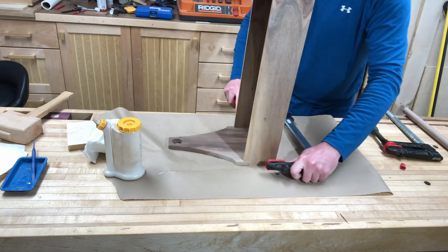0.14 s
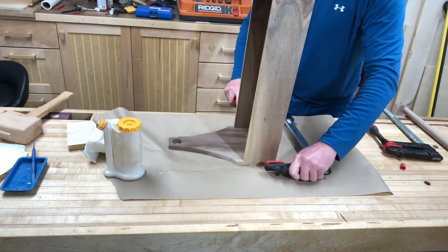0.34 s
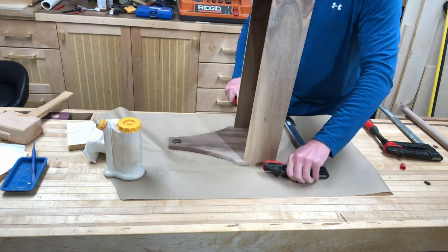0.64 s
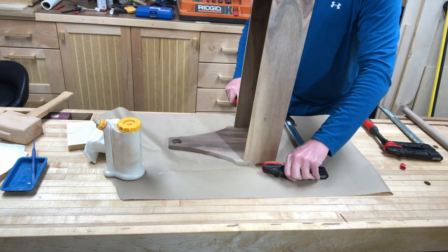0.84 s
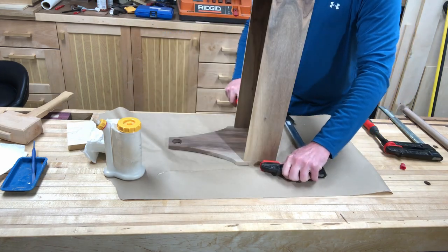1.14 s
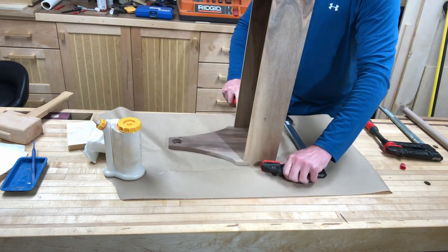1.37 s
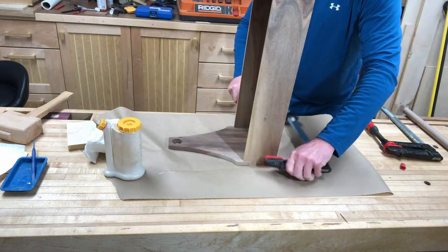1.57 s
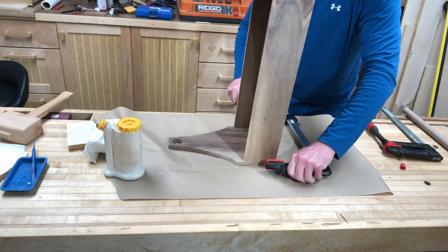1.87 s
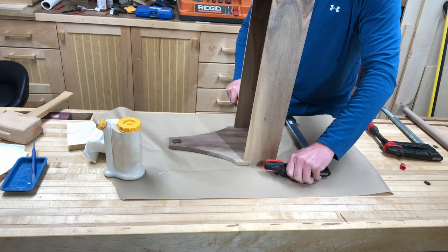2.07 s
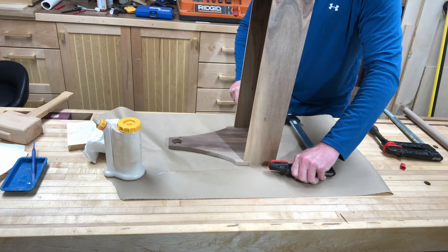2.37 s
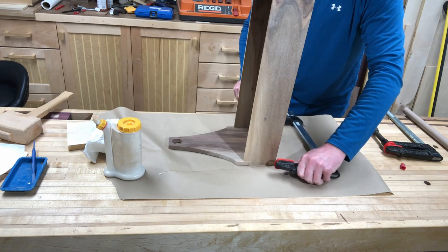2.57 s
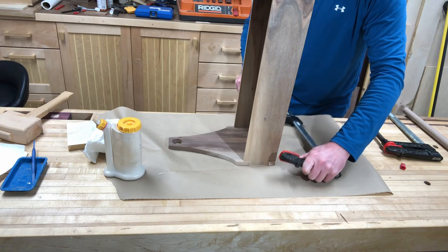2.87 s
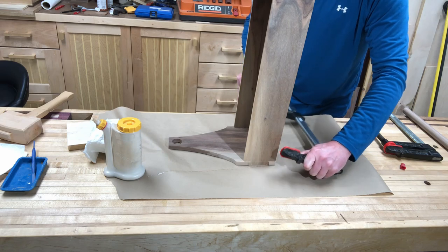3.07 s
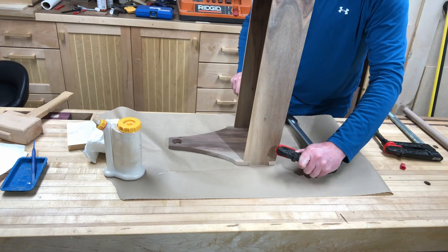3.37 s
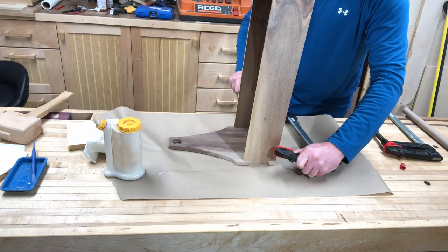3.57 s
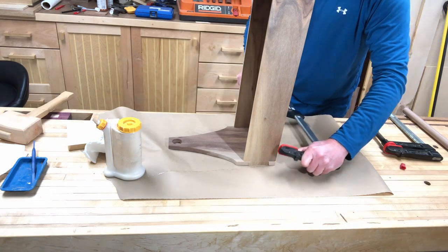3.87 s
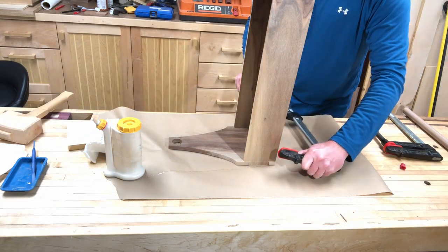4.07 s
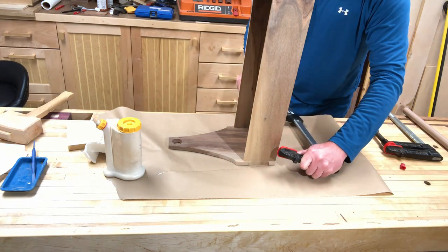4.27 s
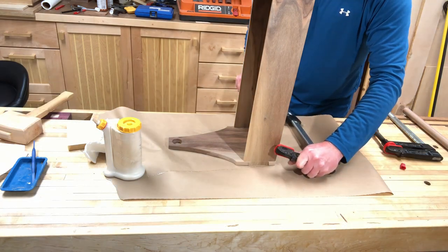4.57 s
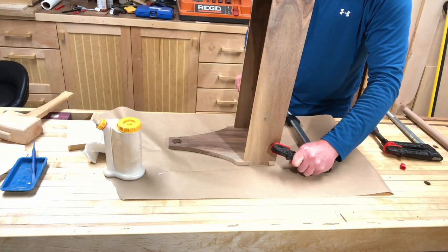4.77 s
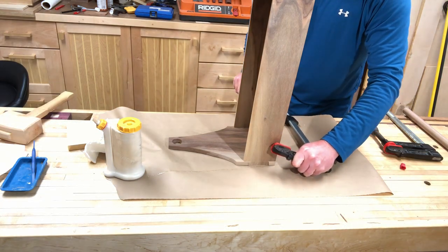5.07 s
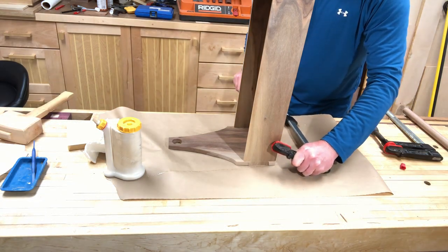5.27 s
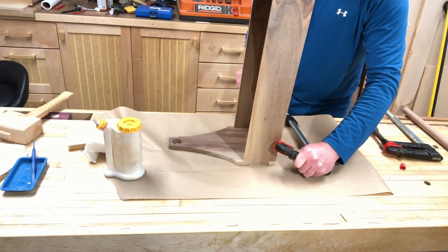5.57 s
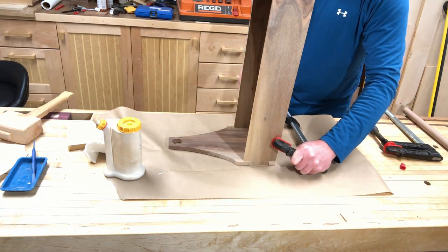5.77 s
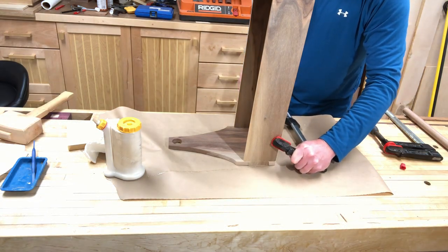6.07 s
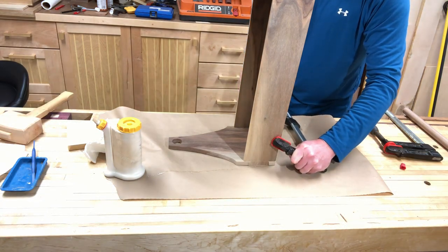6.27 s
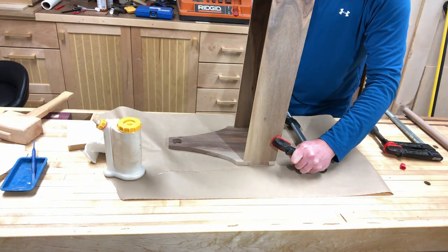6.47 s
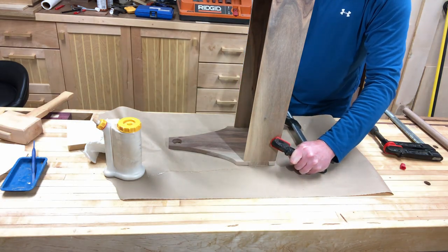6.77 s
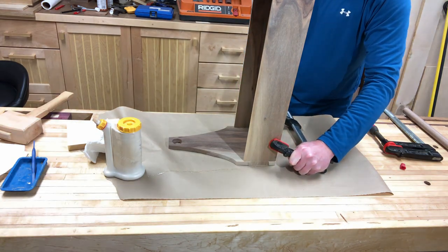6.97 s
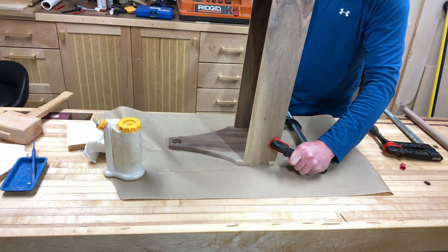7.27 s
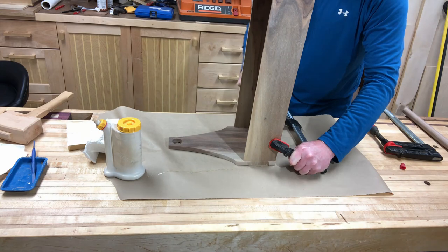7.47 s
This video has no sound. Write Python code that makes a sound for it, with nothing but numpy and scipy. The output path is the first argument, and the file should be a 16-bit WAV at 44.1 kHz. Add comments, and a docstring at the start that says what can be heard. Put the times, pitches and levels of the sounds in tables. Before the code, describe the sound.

A one-handed bar clamp is handled on a wooden bench, heard near in one channel with a short indoor tail. Two quick strong knocks come early, then gritty bar slides with ticking catches, a heavy knock and a hard metallic slam midway. After another hollow thud, action thins to isolated plastic clacks and grainy rubs on wood. A faint low drone swells late as the pressed joint cracks, then near quiet.

```python
"""Bar clamp fitted to a wooden box

A one-handed bar clamp is fitted to a glued box on a workbench, in a small workshop.
Box, bar, jaw, trigger and joint are banks of damped modes struck over bursts of contact noise.
The bar's slide, the hand's rubs and the sleeve are grainy noise; the joint also creaks by small slips.
Under them lie room air and a low drone. Noise tails make the room answer all but the sways and background."""
import sys
import numpy as np
from scipy import signal
from scipy.fft import rfft, irfft, next_fast_len
from scipy.io import wavfile

SR = 44100
rng = np.random.default_rng(int(sys.argv[2]) if len(sys.argv) > 2 else 0)


def unload_audio(sound):
    """Save the sound as a 16-bit wav file, at the path given as the first command line argument."""
    columns = np.transpose(np.atleast_2d(sound))
    # keep every value between -1 and 1, then stretch to whole-number steps
    steps = np.round(np.clip(columns, -1, 1) * 32767)
    wavfile.write(sys.argv[1], SR, steps.astype(np.int16))


N = 336330
TIME = np.arange(N) / SR
TOP_HZ = 15900

# Spectra and modes give relative levels. Hardness tips a blow's treble up against its bass.
# room air spectrum: (frequency [Hz], level [dB per Hz])
AIR = [(15, -44.5), (25, -16), (102, 2), (123, -4.5), (152, -6), (216, -8), (352, -10.5), (513, -15),
       (587, -13.5), (769, -16.5), (1060, -19.5), (3220, -29.5), (5670, -30), (15800, -39)]
AIR_DB = -67.5
# low drone; the release follows the length
DRONE_START_S, DRONE_LENGTH_S, DRONE_ATTACK_S, DRONE_RELEASE_S, DRONE_DB = 5.11, 1.28, 0.59, 0.12, -61.5
# workshop decay: (frequency [Hz], t60 [s])
ROOM = [(100, 0.97), (300, 0.65), (1000, 0.59), (3500, 0.6), (7000, 0.43), (14000, 0.2)]

# sleeve swishes as the arm moves: (time [s], length [s], level [dB])
SWISHES = [(0.11, 0.25, -75.5), (0.366, 0.1, -71), (0.48, 0.08, -68.5), (0.652, 0.054, -61.5),
           (0.947, 0.25, -71), (5.93, 0.19, -70.5)]
# cloth spectrum: (frequency [Hz], level [dB per Hz])
CLOTH = [(300, -30), (1500, 4), (4500, 2), (8000, -3), (15000, -10)]
# hand and pads rub on wood: (time [s], length [s], level [dB], resonance centre [Hz])
RUBS = [(0.411, 0.033, -63, 1660), (0.65, 0.12, -69, 3480), (3.754, 0.058, -56.5, 4440),
        (4.49, 0.039, -66.5, 2460), (4.667, 0.098, -59, 3640), (5.429, 0.04, -71.5, 2710),
        (5.672, 0.054, -55, 1250), (5.72, 0.14, -56, 4070), (6.097, 0.048, -63, 3660),
        (6.592, 0.088, -69.5, 1400), (6.726, 0.042, -66.5, 1340), (6.908, 0.05, -60, 1410),
        (6.999, 0.055, -74, 1190)]
# rub spectrum: (frequency [Hz], level [dB per Hz])
RUB = [(100, -53), (300, -26), (500, 12.5), (750, -1), (1300, 2), (2000, -6.5), (3200, -0.5), (8000, -13.5),
       (15000, -20)]

# shoves of the bar through the jaw: (time [s], length [s], level [dB], level fall [dB/s])
STROKES = [(1.171, 0.098, -47.5, 4), (1.282, 0.21, -48.5, 49), (1.464, 0.053, -45, 20),
           (2.657, 0.2, -58.5, -12), (2.897, 0.035, -41, 29), (5.149, 0.17, -56.5, 54)]
SHOVE_ATTACK_S, SHOVE_RELEASE_S = 0.035, 0.02
# sliding bar catches: (time [s], level [dB], hardness [dB])
CATCHES = [(1.158, -60.5, 6), (1.2005, -42, 4), (1.2972, -45.5, -1), (1.501, -52.5, -1.5), (2.6825, -52, 8),
           (2.8165, -53.5, -0.5), (2.8848, -54.5, -3)]
# bar-in-jaw spectrum: (frequency [Hz], level [dB per Hz])
SLIDE = [(200, -36.5), (500, -5.5), (1000, -5.5), (1600, -1.5), (2500, 0.5), (4200, 4), (5800, 3.5),
         (7600, 0.5), (8600, -6.5), (12000, -9), (15800, -13.5)]
# registers of a catch: (upper edge [Hz], level [dB])
CATCH_BALANCE = [(7000, 0), (20000, 0)]

# joint slips under pressure: (time [s], level [dB], hardness [dB])
CRACKS = [(5.743, -46.5, -7), (5.755, -48, -7), (5.816, -32.5, 5), (5.848, -46.5, 20), (6.017, -39, -6)]
# joint modes: (frequency [Hz], level [dB], t60 [s])
JOINT = [(113, -22, 0.26), (286, 2, 0.03), (313, -23.5, 0.7), (564, 1.5, 0.033), (634, -3, 0.04),
         (908, -1, 0.055), (970, -22, 0.29), (1160, -8, 0.017), (1427, -12.5, 0.026), (1727, -14, 0.019),
         (2816, -19, 0.049)]
# splitting noise spectrum: (frequency [Hz], level [dB per Hz])
SPLIT = [(30, -45), (100, 2.5), (700, 7), (1600, -3), (2300, -16.5), (4500, -15), (9000, -23),
         (15000, -33.5)]
# registers of a crack: (upper edge [Hz], level [dB])
JOINT_BALANCE = [(430, -7), (1100, -0.5), (2500, -11.5), (20000, -19.5)]
# small slips gather before each crack and die away after it
CREAK_DB, CREAK_BUILD_S, CREAK_SETTLE_S = -24, 0.035, 0.05

# box knocks on the bench: (time [s], level [dB], hardness [dB])
KNOCKS = [(0.096, -55.5, -4.5), (0.517, -27.5, 10), (0.572, -30.5, 15), (0.797, -44, 3), (0.974, -49, -6),
          (1.113, -46.5, -5.5), (1.463, -46, -0.5), (2.0, -33, 8), (2.299, -51.5, -6.5), (2.611, -54, -3.5),
          (2.911, -44.5, 8.5), (3.407, -31.5, 3), (4.928, -50, -10.5), (5.11, -62.5, -10),
          (5.538, -56.5, -12.5), (6.763, -51, -2)]
# box modes: (frequency [Hz], level [dB], t60 [s])
BOX = [(152.5, -15.5, .3), (225, -17.5, 0.075), (268.9, -5.5, 0.077), (324, -5.5, 0.047),
       (360.4, -4.5, 0.046), (497, -5, 0.074), (574, -7, 0.04), (782, -9, 0.0469), (907, -13, 0.047)]
# knock noise spectrum: (frequency [Hz], level [dB per Hz])
THUD = [(35, -62), (70, -15), (150, 0), (400, 0), (920, -2.5), (1200, -18), (2500, -41)]
# registers of a knock: (upper edge [Hz], level [dB])
BOX_BALANCE = [(430, 0), (20000, -14)]
# bench top sways under a push: (time [s], level [dB])
SWAYS = [(0.527, -51), (0.81, -44.5), (3.415, -51), (4.931, -59)]
# bench modes: (frequency [Hz], level [dB], t60 [s])
BENCH = [(83.5, -3.5, 0.97), (123, -2, 0.2), (258, -2.5, 0.78)]

# steel bar is hit: (time [s], level [dB], hardness [dB])
CLINKS = [(0.1251, -65, 5), (0.439, -54.5, -1.5), (0.5199, -53, -4.5), (0.573, -48, 1),
          (0.8075, -42.5, 7.5), (1.1283, -54, 7.5), (2.003, -59, -8), (2.1364, -61.5, -10),
          (2.166, -61.5, -13), (3.4071, -48.5, -7), (3.7638, -63, -16.5)]
# bar modes: (frequency [Hz], level [dB], t60 [s])
STEEL = [(1670, -8, 0.062), (1750, -9, 0.089), (2416, -7, 0.095), (2650, -6.5, 0.026), (3380, 11.5, 0.022),
         (3550, -15.5, 0.049), (4010, -17, 0.047), (4300, -6.5, 0.056), (4720, 1, 0.023), (4400, -18, 0.09),
         (5370, -16, .1), (7100, -15, 0.27)]
# registers of a clink: (upper edge [Hz], level [dB])
STEEL_BALANCE = [(2900, -0.5), (5500, 0.5), (20000, -12)]
# sliding jaw slams home: (time [s], level [dB], hardness [dB])
SLAMS = [(2.9095, -29.5, 0.5)]
# jaw modes: (frequency [Hz], level [dB], t60 [s])
JAW = [(1750, -9, 0.093), (2380, -9, 0.055), (2680, -8, .06), (3300, -5, 0.063), (3435, -5.5, 0.051),
       (4190, -4, .04), (4300, -3, 0.032), (4470, 0, 0.049), (5040, -23.5, 0.093), (6420, -24.5, 0.12),
       (7070, -27, 0.13), (7960, -20, 0.1)]
# long-ringing jaw modes: (frequency [Hz], level [dB], t60 [s])
JAW_HUM = [(3370, -28.5, 0.44), (4440, -23, 0.424)]
# registers of a slam: (upper edge [Hz], level [dB])
JAW_BALANCE = [(2900, -13), (5500, 0), (20000, -18.5)]
# plastic trigger and grip clack: (time [s], level [dB], hardness [dB])
CLACKS = [(0.095, -73, -8), (0.418, -70, -4), (2.562, -72.5, -3.5), (3.916, -63.5, -5.5),
          (3.925, -59.5, -6), (4.162, -58.5, -5), (4.169, -48, 0.5), (4.488, -73.5, -13),
          (4.678, -61, -1.5), (4.712, -46, 1), (6.136, -64.5, 10), (6.404, -69, 11)]
# trigger modes: (frequency [Hz], level [dB], t60 [s])
TRIGGER = [(336.5, -25.5, 0.041), (521.4, 3.5, 0.044), (1215, -4.5, 0.063), (1837, -13.5, 0.066),
           (2560, -4.5, 0.066), (3546, 13.5, .025), (4070, -23, 0.041)]
# registers of a clack: (upper edge [Hz], level [dB])
TRIGGER_BALANCE = [(1000, -0.5), (2900, 1), (5500, -2), (20000, -11)]
# clamp contact noise spectrum: (frequency [Hz], level [dB per Hz])
RATTLE = [(50, -54), (150, -16), (300, -7.5), (700, -13), (1200, -8), (2000, -8.5), (4500, -1.5),
          (7000, -13), (9000, -24.5), (15000, -28.5)]


def amp(db):
    """Decibels to gain."""
    return 10 ** (np.asarray(db) / 20)


def unit(x):
    """Scale to rms 1."""
    return x / np.sqrt(np.mean(x ** 2) + 1e-20)


def along(points, hz):
    """Interpolate (Hz, value) points on a log frequency axis."""
    point_hz, values = np.transpose(points)
    return np.interp(np.log(hz + 1), np.log(point_hz + 1), values)


def filtered(x, gain):
    """Apply a frequency-dependent gain."""
    size = next_fast_len(len(x) + 4096)
    hz = np.fft.rfftfreq(size, 1 / SR)
    return irfft(rfft(x, size) * gain(hz), size)[:len(x)]


def coloured(x, spectrum):
    """Shape x by a spectrum, at rms 1."""
    return unit(filtered(x, lambda hz: amp(along(spectrum, hz))))


def add(track, start_s, x):
    """Mix x into the track at start_s."""
    start = max(round(start_s * SR), 0)
    track[start:start + len(x)] += x[:N - start]


def wander(t, rate_hz):
    """Random values drawn at rate_hz, joined by straight lines."""
    return np.interp(t * rate_hz, np.arange(len(t)), rng.standard_normal(len(t)))


def envelope(start_s, length_s, attack_s, release_s):
    """Rise from the start, hold to the end of the length, then release."""
    t = TIME - start_s
    return np.clip(t / attack_s, 0, 1) * np.clip(1 - (t - length_s) / release_s, 0, 1)


def arch(t, length_s):
    """A stroke of the hand: it gathers speed and comes to rest."""
    return np.sqrt(np.abs(np.sin(np.pi * np.clip(t / length_s, 0, 1))))


def in_room(x, wet_db, early_db=-5, early_t60_s=0.11):
    """Direct sound, quick reflections from bench and cabinets, then the workshop's tail."""
    hz, t, bins = signal.stft(rng.standard_normal(SR * 3 // 4), SR, nperseg=256)
    decay = amp(-60 * t / along(ROOM, hz)[:, None])
    tail = signal.istft(bins * decay, SR, nperseg=256)[1]
    t = np.arange(len(tail)) / SR
    fade_in = np.clip(t / 0.004 - 1, 0, 1)  # silent for 4 ms, full at 8 ms
    early = rng.standard_normal(len(t)) * amp(-60 * t / early_t60_s)
    reflections = unit(fade_in * tail) + amp(early_db) * unit(fade_in * early)
    answer = amp(wet_db) * reflections / np.sqrt(len(t))
    return x + signal.fftconvolve(x, answer)[:len(x)]


def ring(modes, t, scatter_db=3.0, blur_s=2e-6):
    """Damped modes, new strengths per blow; loose contacts make phase wander, most in the treble."""
    loose_t = t + blur_s * np.cumsum(rng.standard_normal(len(t)))  # blur_s is the step per sample
    total = 0
    for k, (hz, db, t60_s) in enumerate(modes):
        decay = amp(db + scatter_db * rng.normal() - 60 * t / t60_s)
        total = total + (-1) ** k * decay * np.sin(2 * np.pi * hz * loose_t)
    return total


def blows(rows, modes, contact, balance, attack_s, noise_db, noise_t60_s, wet_db):
    """Each blow rings the modes over contact noise; its hardness tips the balance of the registers."""
    track = np.zeros(N)
    t = np.arange(SR * 3 // 4) / SR
    onset = t < 0.012
    leans = np.linspace(-0.5, 0.5, len(balance))
    for start_s, db, hardness_db in rows:
        noise = coloured(rng.standard_normal(len(t)), contact) * amp(noise_db - 60 * t / noise_t60_s)
        # the parts meet over a short time
        rest = (ring(modes, t) + noise) * (1 - np.exp(-(t / attack_s) ** 2))
        blow = 0
        # split off registers from low to high, each levelled by its onset
        for (edge_hz, register_db), lean in zip(balance, leans):
            part = filtered(rest, lambda hz: 1 / (1 + (hz / edge_hz) ** 12))
            rest = rest - part
            blow = blow + amp(register_db + lean * hardness_db) * part / np.std(part[onset])
        add(track, start_s, in_room(amp(db) * blow, wet_db))
    return track


def friction(spectrum, grain_db, grains_hz):
    """Noise of many tiny slips, each with its own size."""
    sizes = wander(TIME, grains_hz)
    return coloured(rng.standard_normal(N) * amp(grain_db * sizes), spectrum)


def background(drone_hz=73.6):
    """Quiet noise of room air, and a slightly wavering sine that swells as the clamp is tightened."""
    waver = coloured(rng.standard_normal(N), [(4, 0), (15, -20), (40, -100)])
    swell = envelope(DRONE_START_S, DRONE_LENGTH_S, DRONE_ATTACK_S, DRONE_RELEASE_S)
    drone = swell * np.sqrt(2) * np.sin(2 * np.pi * drone_hz * TIME + 0.2 * waver)
    air = coloured(rng.standard_normal(N), AIR)
    return amp(DRONE_DB) * drone + amp(AIR_DB) * air


def sleeve():
    """A faint, bright, grainy swish of cloth with each move of the arm."""
    motion = sum(amp(db) * arch(TIME - start_s, length_s) for start_s, length_s, db in SWISHES)
    cloth = friction(CLOTH, grain_db=8, grains_hz=402)
    return in_room(motion * cloth, wet_db=-2.5)


def handling(lift_db=7):
    """Short, grainy rubs that swell and fade, each with a broad resonance of its own."""
    track = np.zeros(N)
    t = np.arange(SR // 2) / SR
    for start_s, length_s, db, centre_hz in RUBS:
        grains = wander(t, 150)
        rub = coloured(rng.standard_normal(len(t)) * amp(4.3 * grains), RUB)
        rub = unit(filtered(rub, lambda hz: 1 + amp(lift_db) / (1 + (5 * (hz / centre_hz - 1)) ** 2)))
        add(track, start_s, amp(db) * rub * arch(t, length_s))
    return in_room(track, wet_db=-5.0)


def slide(burrs_hz=90, judder_db=3.42, judder_hz=60):
    """The bar hisses through the jaw at a juddering speed, crackles over burrs and catches."""
    speed = 0
    for start_s, length_s, db, fall_db_per_s in STROKES:
        level_db = db - fall_db_per_s * np.clip(TIME - start_s, 0, length_s)
        speed = speed + amp(level_db) * envelope(start_s, length_s, SHOVE_ATTACK_S, SHOVE_RELEASE_S)
    burrs = (rng.random(N) < burrs_hz / SR) * rng.standard_normal(N)
    # each burr gives a noise grain of 40 samples
    burr_grain = rng.standard_normal(40) * np.hanning(40)
    grit = coloured(signal.lfilter(burr_grain, 1, burrs), SLIDE)
    judder = amp(judder_db * wander(TIME, judder_hz))
    hiss = friction(SLIDE, grain_db=3.5, grains_hz=703)
    scrape = speed * judder * (hiss + amp(-11) * grit)
    ticks = blows(CATCHES, [], SLIDE, CATCH_BALANCE,
                  attack_s=0.00033, noise_db=0, noise_t60_s=0.015, wet_db=-1.5)
    return in_room(scrape, wet_db=-4.0) + ticks


def joint(slips_hz=140):
    """Irregular small slips make the wood creak around each big one, which cracks."""
    strain = 0
    for crack_s, db, _ in CRACKS:
        distance = np.maximum((crack_s - TIME) / CREAK_BUILD_S, (TIME - crack_s) / CREAK_SETTLE_S)
        strain = strain + amp(db) * np.exp(-distance)
    slips = (rng.random(N) < slips_hz / SR) * amp(4 * rng.standard_normal(N))
    slip_ring = ring(JOINT, np.arange(SR // 2) / SR)
    creak = unit(signal.fftconvolve(slips, slip_ring)[:N]) * strain
    cracks = blows(CRACKS, JOINT, SPLIT, JOINT_BALANCE,
                   attack_s=0.0013, noise_db=-1.0, noise_t60_s=0.0474, wet_db=-6.0)
    return amp(CREAK_DB) * in_room(creak, wet_db=-7) + cracks


def box():
    """Dull modal knocks of the box, and the low, slow-decaying sway of the bench top under it."""
    track = blows(KNOCKS, BOX, THUD, BOX_BALANCE,
                  attack_s=0.0042, noise_db=-4.0, noise_t60_s=0.1, wet_db=-5.5)
    t = np.arange(SR) / SR
    for start_s, db in SWAYS:
        add(track, start_s, amp(db) * ring(BENCH, t) * (1 - np.exp(-(t / 0.018) ** 2)))
    return track


def clamp():
    """Struck modes: the steel bar clinks, the jaw rings as it slams home, the plastic trigger clacks."""
    steel = blows(CLINKS, STEEL, RATTLE, STEEL_BALANCE,
                  attack_s=0.0016, noise_db=13.5, noise_t60_s=0.027, wet_db=-3)
    jaw = blows(SLAMS, JAW + JAW_HUM, RATTLE, JAW_BALANCE,
                attack_s=0.0015, noise_db=-1.5, noise_t60_s=0.033, wet_db=-9)
    trigger = blows(CLACKS, TRIGGER, RATTLE, TRIGGER_BALANCE,
                    attack_s=0.0028, noise_db=16.0, noise_t60_s=0.027, wet_db=-5)
    return steel + jaw + trigger


def scene():
    """Sum of all sources, in one channel."""
    return (box() + clamp() + slide() + handling() + sleeve() + joint() + background())[None]


def record(dry, low_cut_hz=42):
    """Thin the deep bass and keep nothing from TOP_HZ up."""
    high_pass = signal.butter(2, low_cut_hz, "highpass", fs=SR, output="sos")
    thinned = signal.sosfilt(high_pass, dry)
    return np.array([filtered(channel, lambda hz: hz < TOP_HZ) for channel in thinned])


dry = scene()
out = record(dry)
unload_audio(out)
```